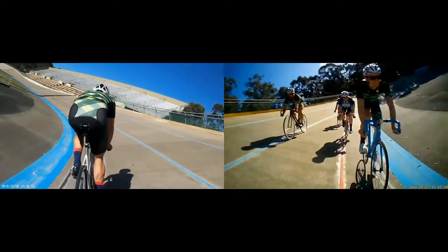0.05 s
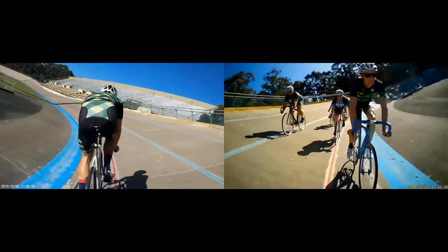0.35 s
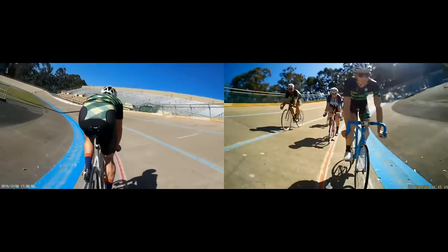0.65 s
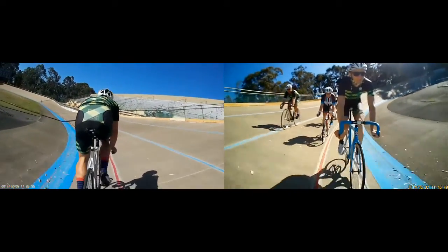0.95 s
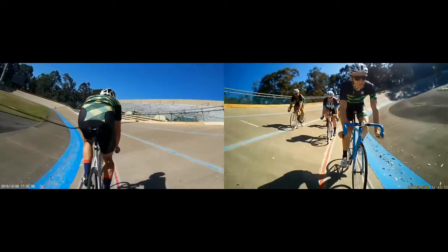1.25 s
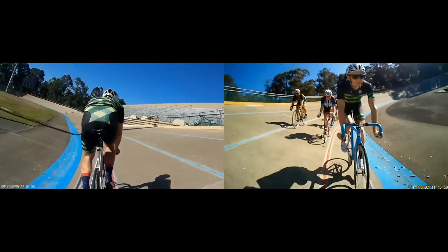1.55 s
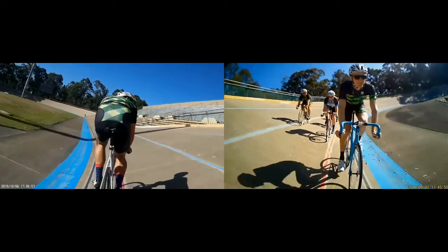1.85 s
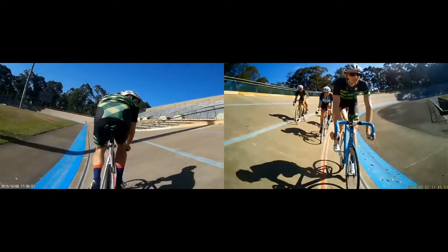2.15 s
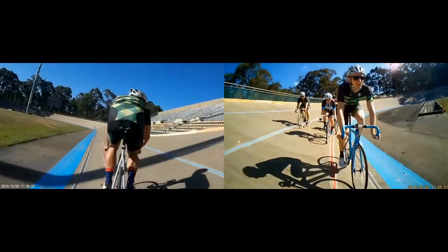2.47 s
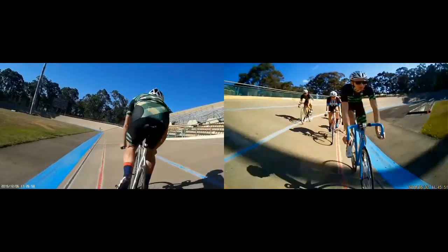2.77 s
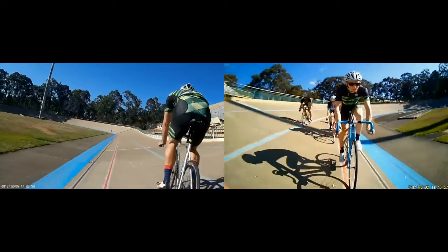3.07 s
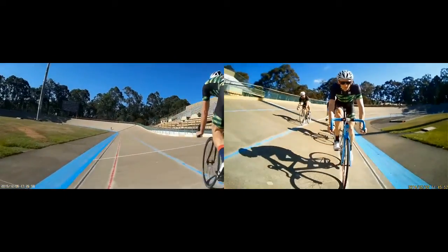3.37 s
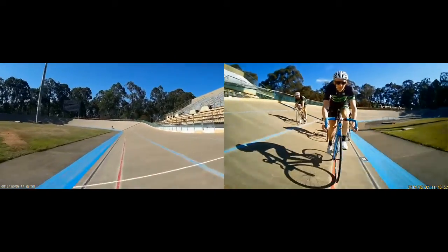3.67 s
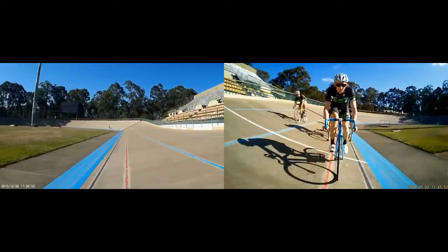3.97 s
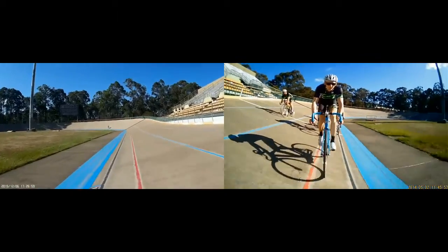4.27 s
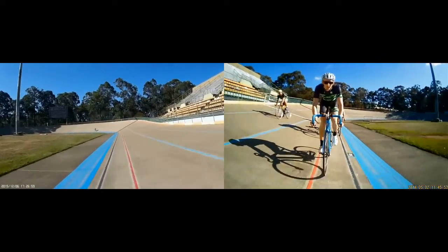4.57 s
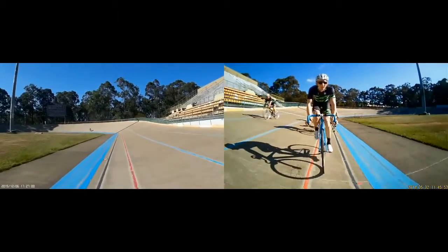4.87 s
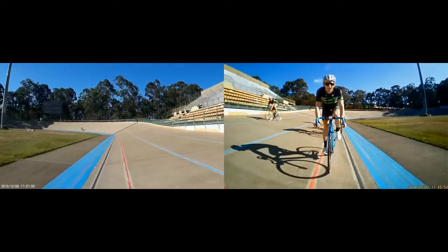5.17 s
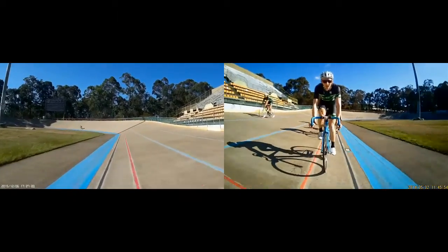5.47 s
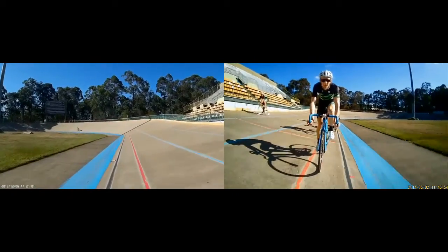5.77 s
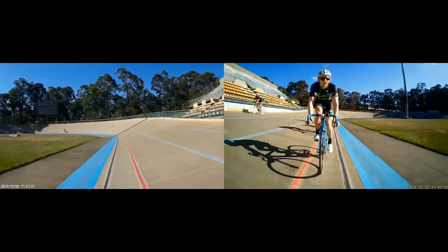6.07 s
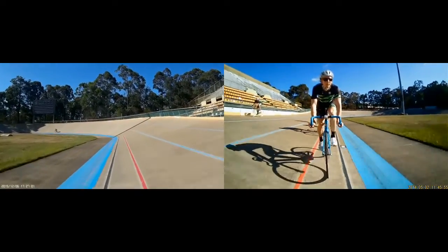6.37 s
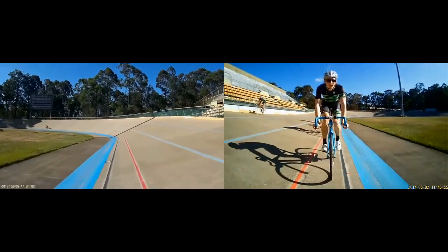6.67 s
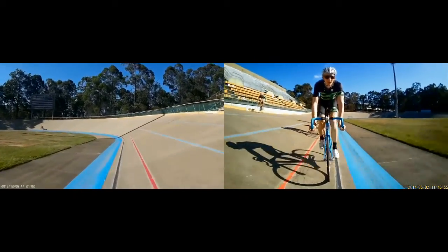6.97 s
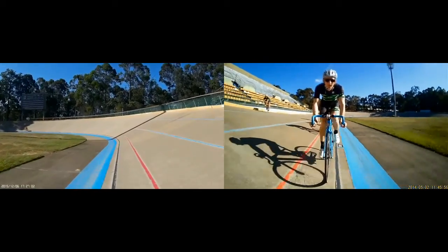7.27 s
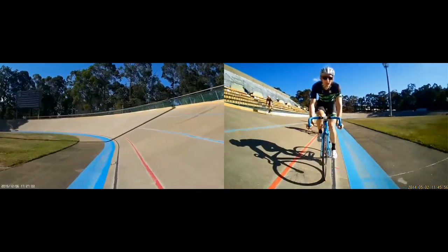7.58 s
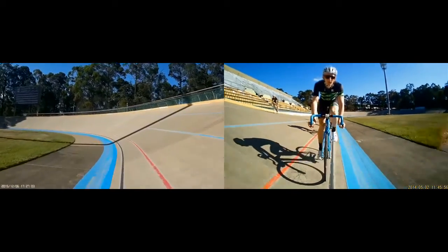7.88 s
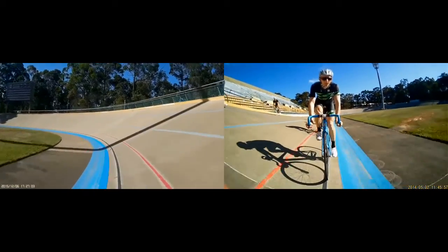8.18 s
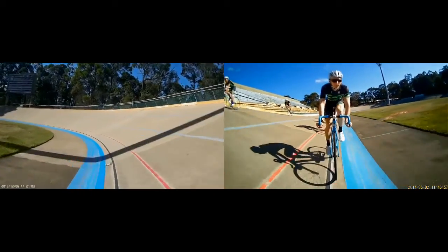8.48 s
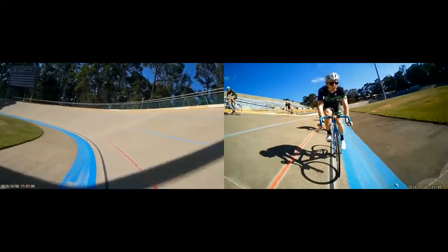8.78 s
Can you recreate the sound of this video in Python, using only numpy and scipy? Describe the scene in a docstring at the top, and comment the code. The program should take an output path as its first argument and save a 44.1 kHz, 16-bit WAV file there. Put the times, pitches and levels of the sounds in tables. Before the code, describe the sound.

A bicycle laps an open-air concrete track, heard from a microphone on its frame. Low, gusty wind noise is loudest throughout, moderate at first and then rougher, with clusters of blunt blows from about a third of the way in. Quieter tyre noise runs evenly beneath it, along with a faint chain whir, occasional light rattles and a few brief gritty scrapes.

```python
"""A concrete velodrome, heard from a microphone fixed to the frame of a lapping track bicycle.
Rough concrete excites the tyres, whose rush is coloured by resonances of the frame and housing.
The chain strikes the chainring tooth by tooth, and now and then grates, ticks and clinks.
Loudest is the wind: turbulent pressure rumbles on the microphone and single eddies slap it.
Tyres, chain and rumble swell a little with each pedal stroke."""
import sys
import numpy as np
from scipy import signal
from scipy.fft import rfft, irfft, next_fast_len
from scipy.io import wavfile
from scipy.ndimage import uniform_filter1d, map_coordinates

SR = 44100
rng = np.random.default_rng(int(sys.argv[2]) if len(sys.argv) > 2 else 0)


def transcribe(signal):
    """Save signal, clipped to [-1, 1], as a 16-bit WAV file at the path in sys.argv[1]."""
    frames = np.atleast_2d(signal).T
    limited = np.clip(frames, -1, 1)
    pcm = np.round(limited * 32767).astype(np.int16)
    wavfile.write(sys.argv[1], SR, pcm)


N = 389403

# Spectral shapes: frequency_hz, relative_db
TYRE_SPECTRUM = [(100, 4), (400, 10.5), (700, -8), (1150, 2.5), (1500, -5), (1900, -1), (2800, -1),
                 (3400, 2), (4100, -1.5), (4600, -9), (7000, -12.5), (8300, -18.5), (10000, -16),
                 (13000, -25)]  # rubber on concrete
LINK_SPECTRUM = [(1500, 6), (3300, -8), (5000, 3), (7300, 2.5), (8200, 0.5), (9000, 2), (10300, 1.5),
                 (11000, -5), (12800, -2), (14000, -30)]  # steel contacts
GRATE_SPECTRUM = [(2000, -19), (3500, 6), (5500, -2), (7800, 0), (9000, -19), (13000, -24)]  # plates rubbing teeth
RUMBLE_SPECTRUM = [(8, -6), (20, 2.5), (36, 1), (55, -3), (80, -13), (120, -24), (200, -35.5), (400, -47.5),
                   (1000, -104)]  # large eddies
BUFFET_SPECTRUM = [(20, -26), (50, -0.5), (80, 3.5), (125, -6), (180, -12.5), (260, -18), (400, -29.5),
                   (1000, -77.5)]  # middle layer of the wind
FLUTTER_SPECTRUM = [(60, -17), (130, 0), (220, -3), (330, -8), (500, -12.5), (750, -19), (1200, -27),
                    (2000, -38.5), (5000, -72)]  # small eddies
SLAP_SPECTRUM = [(40, -5), (150, 7), (300, 1), (550, -13.5), (800, -18.5), (1400, -32), (2500, -50.5),
                 (10000, -80)]  # body of an eddy's blow
TEAR_SPECTRUM = [(200, -4.5), (650, 7), (850, -8), (1250, -8), (1800, -16.5), (3000, -23), (4500, -31),
                 (10000, -80)]  # its bright edge
# Resonances and a notch of the frame and housing: centre_hz, width_hz, lift_db
HOUSING_RESONANCES = [(385, 68, 8), (557.6, 55, 13), (878, 94, 16.5), (1132, 54, 3.5), (1342, 54, 10.5),
                      (1730, 99, 5.5), (1843, 83, -5.5), (2177, 150, 5), (3240, 120, 3), (3900, 140, 2)]
# Modes of the steel parts: pitch_hz, relative_db, t60_s
CHAINRING_MODES = [(3256, 1.5, 0.029), (3460, 2, 0.023), (3784, -2, 0.02)]
ROLLER_MODES = [(6770, -5.5, 0.022), (9500, 0.5, 0.024), (10250, -11, .012)]
PLATE_MODES = [(3310, 5, 0.022), (3490, 2, 0.017), (3840, -0.5, 0.019), (6800, -7, .012)]
# Chain speed: time_s, teeth_per_s
TOOTH_RATE = [(0, 86), (2, 84.6), (4, 86.8), (6, 87), (8.8, 86.8)]
# Level contours: time_s, relative_db
CHAIN_CONTOUR = [(0, -56.5), (1.3, -55), (1.74, -57), (1.95, -54.5), (2.4, -55), (3.24, -65), (3.8, -58.5),
                 (5.3, -64.5), (5.55, -54), (5.8, -56.5), (6.5, -59), (6.88, -54.5), (7.55, -62.5),
                 (7.74, -55.5), (8.78, -64.5)]  # running noise of the chain
RING_CONTOUR = [(0, -59.5), (2.2, -58), (2.55, -54), (3.1, -59), (3.24, -64), (3.4, -58), (4.45, -57),
                (4.65, -58.5), (5.3, -58.5), (6.4, -60), (7.0, -57), (8.8, -60)]  # chainring under the seating rollers
FLOW_CONTOUR = [(0.0, -22), (0.05, -20), (0.12, -31.5), (0.42, -30), (0.51, -25), (0.58, -31.5),
                (0.73, -24.5), (0.78, -29.5), (1.1, -25), (1.22, -25.5), (1.27, -25.5), (1.47, -30.5),
                (1.57, -24), (1.74, -36.5), (1.96, -21.5), (2.25, -24), (2.28, -29), (2.4, -23),
                (2.45, -36), (2.5, -22.5), (2.87, -19.5), (2.89, -14.5), (3.09, -22), (3.33, -17),
                (3.38, -26), (3.45, -15), (3.67, -23), (3.8, -14), (3.87, -15.5), (3.92, -24),
                (3.95, -15.5), (4.16, -20), (4.29, -15), (4.48, -22), (4.63, -15), (4.71, -26), (4.81, -24),
                (4.88, -16.5), (4.99, -22.5), (5.07, -18), (5.12, -24.5), (5.2, -19), (5.27, -28),
                (5.39, -14.5), (5.44, -16.5), (5.68, -17.5), (5.83, -26.5), (5.96, -19), (6.35, -22.5),
                (6.37, -26), (6.54, -17), (6.77, -27.5), (6.86, -19.5), (6.91, -25.5), (6.96, -22),
                (7.27, -21.5), (7.38, -15.5), (7.53, -22), (7.68, -18), (7.79, -26), (7.89, -17),
                (8.09, -21.5), (8.13, -17.5), (8.33, -20), (8.36, -15.5), (8.48, -24.5), (8.8, -16.5)]  # rumble of the air flow, with brief lulls
TURBULENCE_CONTOUR = [(0, -53), (.5, -40.5), (1.05, -42), (1.3, -42.5), (1.85, -46), (2.07, -39),
                      (2.3, -59), (2.56, -44), (2.64, -36.5), (3.05, -37), (3.14, -40), (3.3, -30),
                      (3.8, -35.5), (4.08, -35), (4.4, -35), (4.6, -36), (4.75, -33.5), (5.0, -34),
                      (5.26, -43), (5.45, -32.5), (5.62, -31), (5.8, -42.5), (6.0, -37), (6.12, -35),
                      (6.4, -34), (6.58, -39), (7.08, -38.5), (7.3, -34), (7.58, -43), (7.85, -46),
                      (8.1, -39.5), (8.24, -35.5), (8.36, -38.5), (8.65, -35), (8.8, -32.5)]  # flutter, rising once the rider ahead swings off
# Brief swells of the chain: middle_s, length_s, level_db
PING_SWELLS = [(2.935, 0.046, -62), (4.07, .09, -67), (4.448, 0.036, -52), (5.0, .04, -55), (5.18, .1, -64),
               (5.56, 0.11, -61), (6.67, .12, -61), (7.6, .03, -61), (7.75, .09, -58)]  # rollers ping harder
GRATE_SWELLS = [(2.753, 0.15, -53.5), (3.813, 0.12, -54), (4.19, 0.19, -53)]  # plates grate
# Ticks of small steel parts: start_s, ring_db, pitch_hz, t60_s, crack_db
STEEL_TICKS = [(0.2005, -47, 9600, .02, -48), (0.575, -54, 9600, .02, -42), (0.7253, -42, 9560, .022, -49),
               (0.7617, -46, 9690, .02, -46), (0.8435, -44, 9560, .02, -47), (1.312, -44, 9300, 0.018, -41),
               (1.856, -42, 9560, .022, -46), (2.2309, -48, 9500, .02, -48), (2.312, -51, 9560, .02, -45),
               (2.6853, -42, 7800, .011, -52), (2.788, -40, 7700, .011, -52), (2.818, -37, 7700, .011, -56),
               (3.794, -37, 7600, .011, -48), (3.8911, -47, 9700, .012, -47),
               (4.1331, -49, 7600, 0.0099, -48), (4.2555, -34, 7640, 0.0096, -46),
               (4.5531, -45, 9500, .02, -47), (4.7046, -47, 7010, .011, -43), (5.068, -52, 9600, .02, -46),
               (5.6325, -42, 9500, .02, -46), (5.7698, -48, 9500, .02, -53), (6.2627, -45, 9600, .02, -48),
               (6.8069, -43, 9450, 0.02, -54), (7.1397, -42, 7660, .011, -53), (7.477, -43, 9600, .03, -44),
               (7.49, -45, 9700, .02, -51), (8.3814, -47, 6660, .011, -46)]
# Duller clinks of the shaking chain: start_s, relative_db
CHAIN_SHAKES = [(0.2104, -49), (0.341, -39), (0.4823, -48), (1.1827, -42), (2.0368, -44), (2.2887, -48),
                (2.545, -45), (2.755, -47), (2.9913, -45), (3.0849, -45), (3.5666, -44.5), (3.68, -43),
                (3.78, -40), (3.8067, -44), (4.2228, -43), (4.2557, -43), (4.4278, -46), (5.2874, -38),
                (6.385, -43), (7.5102, -42), (8.62, -41.5)]
# Pressure swings of large eddies: middle_s, peak_db, width_s
PRESSURE_SWINGS = [(1.123, -11.5, 0.0023), (2.899, -4, 0.0031), (3.992, -6, 0.0018), (5.392, -3.5, 0.0043),
                   (6.545, -9, 0.0049), (7.422, -17.5, 0.00074)]
# Eddies striking the microphone: time_s, relative_db, edge_re_body_db, t60_s
EDDY_IMPACTS = [(0.036, -19, -33, 0.11), (0.527, -21, -15, 0.13), (0.618, -23, -24, 0.097),
                (0.976, -18.5, -12.5, 0.11), (1.024, -22, -30, 0.066), (1.084, -23, -7, 0.062),
                (1.121, -20, -24, 0.11), (1.153, -17, -16, 0.054), (1.534, -23, -18, 0.15),
                (1.636, -26, -25, 0.055), (2.389, -24, -10, 0.035), (2.723, -16.5, -20, 0.043),
                (2.893, -10.5, -11.5, 0.039), (2.932, -17.5, -7.5, 0.088), (2.987, -19.5, -8, .06),
                (3.051, -17, -32, 0.074), (3.293, -11.5, -22, 0.14), (3.352, -10.5, -12, .04),
                (3.364, -12, -12, 0.036), (3.371, -10, -13, .02), (3.375, -5.5, -5.5, 0.033),
                (3.435, -13, -12.5, .03), (3.441, -10.5, -22, .03), (3.533, -24, -28, .06),
                (3.622, -17.5, -25, 0.055), (3.776, -16, -17, 0.067), (3.836, -19.5, -10, .07),
                (3.87, -16, -26, 0.036), (3.935, -16.5, -17, .05), (3.986, -14.5, -14, 0.15),
                (4.006, -14.5, -9, 0.1), (4.138, -25, -5.5, .05), (4.205, -21, -6.5, 0.2),
                (4.326, -9.5, -9.5, 0.046), (4.348, -12, -15, .035), (4.377, -12.5, -20, 0.047),
                (4.47, -16.5, -6, 0.041), (4.512, -10, -3, 0.062), (4.522, -11.5, -5, 0.029),
                (4.578, -15.5, -11, 0.093), (5.312, -15.5, -20, 0.037), (5.391, -13, -6.5, 0.14),
                (5.413, -14, -8, 0.046), (5.434, -18, -5, 0.037), (5.516, -15, -7, 0.039),
                (5.565, -12, -12, .04), (5.594, -9, -15, .05), (5.612, -15, -13, 0.037),
                (5.655, -13, -16, 0.081), (5.696, -13.5, -6, .05), (5.866, -18, -32, .07),
                (5.994, -16, -11, .07), (6.019, -9.5, -5.5, 0.14), (6.158, -11, -24, 0.054),
                (6.185, -11.5, -7, 0.047), (6.524, -14, -11, 0.14), (6.54, -11, -11.5, 0.14),
                (6.56, -8, -19, .04), (6.64, -20, -26, .04), (6.737, -11.5, -20, .085),
                (7.22, -21, -19, 0.092), (7.248, -16, -22, 0.14), (7.421, -15.5, -4, 0.036),
                (7.643, -17, -18, 0.13), (7.742, -16, -25, 0.044), (7.862, -12.5, -38, 0.049),
                (8.225, -14, -13, 0.089), (8.771, -14.5, -10.5, 0.28)]

CHAINRING_TEETH = 48
TYRE_DB, PING_DB, RASP_DB = -45, -10.5, -1.3  # ping and rasp are relative to the chain contour
RUMBLE_DB, FLUTTER_DB, GUST_DB = 1.2, -1, 1.5  # offsets to the wind contours; depth of random gusts
BUFFET_DB, BUFFET_GROWTH = -9, 0.18  # relative to the rumble; extra dB per dB of flow
EDDY_RISE_S, WAKE_RISE_S, WAKE_FALL_S = 0.021, 0.13, 0.1  # times for a change of 60 dB
WAKE_DB = -22.5  # ragged air around an eddy, relative to its peak
OVERLOAD, TOP_HZ = 0.94, 13600  # the microphone's amplitude ceiling and band limit


def amp(db):
    """Amplitude ratio of a level in decibels."""
    return 10 ** (np.asarray(db) / 20)


def unit(x):
    """Normalisation to rms 1."""
    return x / np.sqrt(np.mean(x ** 2) + 1e-20)


def contour(rows):
    """Linear interpolation of (time_s, value) rows at every sample."""
    return np.interp(np.arange(N) / SR, *np.transpose(rows))


def wobble(rate_hz):
    """Smooth random modulation of rms 1: a spline through rate_hz knots a second."""
    knots = rng.standard_normal(int(N * rate_hz / SR) + 4)
    return unit(map_coordinates(knots, [np.arange(N) * rate_hz / SR]))


def swells(rows):
    """Gaussian envelopes: the gain rises and falls once for each row."""
    t = np.arange(N) / SR
    return sum(amp(db) * np.exp(-(2 * (t - s) / length) ** 2) for s, length, db in rows)


def colour(x, spectrum, peaks=()):
    """Minimum-phase filtering by a smooth spectrum with resonances on top; the result has rms 1."""
    size = 2 * next_fast_len(N // 2 + 8192)
    hz = np.fft.rfftfreq(size, 1 / SR)
    knot_hz, knot_db = np.transpose(spectrum)
    db = np.interp(np.log(hz + 1), np.log(knot_hz + 1), knot_db)
    db += sum(lift / (1 + (2 * (hz - centre) / width) ** 2) for centre, width, lift in peaks)
    cepstrum = irfft(np.log(amp(db)))
    cepstrum[1:size // 2] *= 2  # folding the cepstrum makes the filter causal
    cepstrum[size // 2 + 1:] = 0
    return unit(irfft(rfft(x, size) * np.exp(rfft(cepstrum)))[:N])


def noise(spectrum):
    """Spectral shaping of white noise, at rms 1."""
    return colour(rng.standard_normal(N), spectrum)


def steady(x, seconds):
    """Division by the running rms evens out swells slower than the given time."""
    power = uniform_filter1d(x ** 2, max(int(seconds * SR), 8))
    return x / np.sqrt(np.abs(power) + 1e-6)


def patches(x, depth_db):
    """Band-wise modulation: each band swells and sinks on its own for about a tenth of a second."""
    bands = signal.stft(x, nperseg=1024)[2]
    field = uniform_filter1d(rng.standard_normal(bands.shape), size=6, axis=0)
    field = uniform_filter1d(field, size=8, axis=1)
    return signal.istft(bands * amp(depth_db * unit(field)), nperseg=1024)[1][:N]


def ringing(starts, gains, modes, detune):
    """Modal superposition: each knock excites damped sines, a little off in pitch and strength."""
    lag = np.arange(SR // 40)
    t, waves = lag / SR, 0
    scatter = rng.standard_normal((len(starts), len(modes), 2))
    for k, (hz, db, t60) in enumerate(modes):
        pitch, strength = scatter[:, k].T[:, :, None]
        envelope = amp(db + 2.5 * strength - 60 * t / t60)
        waves = waves + envelope * np.sin(2 * np.pi * hz * (1 + detune * pitch) * t)
    waves *= gains[:, None] * (1 - np.exp(-t / .0003))
    return np.bincount((starts[:, None] + lag).ravel(), waves.ravel(), N)[:N]


def pedalling(depth_db, peak_turns, per_turn=2):
    """Periodic modulation in dB, locked to the cranks; two swells a turn are one for each leg."""
    turns = np.cumsum(contour(TOOTH_RATE)) / SR / CHAINRING_TEETH
    return depth_db * np.cos(2 * np.pi * per_turn * (turns - peak_turns))


def tyres():
    """Roughness excitation: rubber on concrete makes a grainy rush that rings frame and housing."""
    level_db = TYRE_DB + pedalling(depth_db=1, peak_turns=.48) + 0.37 * wobble(3.3)
    grain = amp(0.99 * wobble(30) + 1.67 * wobble(400))
    road = patches(grain * rng.standard_normal(N), depth_db=1.5)
    return amp(level_db) * colour(road, TYRE_SPECTRUM, HOUSING_RESONANCES)


def chain():
    """Periodic impact: each roller pings, scrapes and rings the chainring as it seats on a tooth."""
    tension_db = pedalling(depth_db=0.9, peak_turns=0.47)  # each stroke tightens the chain
    running_db = contour(CHAIN_CONTOUR) + tension_db
    seats = np.diff(np.floor(np.cumsum(contour(TOOTH_RATE)) / SR), prepend=0)
    impacts = seats * amp(2 * rng.standard_normal(N) + 2.2 * wobble(26))
    starts = np.flatnonzero(seats)
    ring = steady(ringing(starts, impacts[starts], CHAINRING_MODES, detune=0.028), seconds=0.17)
    roller_hits = (impacts * amp(2 * wobble(24)))[starts]
    ping = steady(ringing(starts, roller_hits, ROLLER_MODES, detune=0.0076), seconds=0.13)
    loose_links = rng.random(N) < 200 / SR  # about 200 knocks a second
    chatter = loose_links * amp(-9 + 4.5 * rng.standard_normal(N) + 2.5 * wobble(25))
    t = np.arange(SR // 20) / SR
    scrape = amp(-60 * t / .034) * (1 - np.exp(-t / .0002))
    contact = signal.oaconvolve(impacts + chatter, scrape)[:N]
    rasp = steady(colour(contact * rng.standard_normal(N), LINK_SPECTRUM), seconds=0.22)
    ring_gain = amp(contour(RING_CONTOUR) + tension_db + 1.5 * wobble(30))
    ping_gain = np.hypot(amp(running_db + PING_DB), swells(PING_SWELLS))
    rasp_gain = amp(running_db + RASP_DB + 1.1 * wobble(24))
    return ring_gain * ring + ping_gain * ping + rasp_gain * rasp


def grates():
    """Sliding friction: link plates rub the side of the teeth with a gritty hiss."""
    grit = amp(4.4 * wobble(180)) * rng.standard_normal(N)
    return swells(GRATE_SWELLS) * colour(grit, GRATE_SPECTRUM)


def faint_ticks(count=10, middle_db=-49, middle_hz=7000):
    """Uniform scatter in time, level and pitch gives further rows like those of STEEL_TICKS."""
    when, strength, pitch = rng.random((count, 3)).T
    levels_db = middle_db + 6 * (strength - .5)
    pitches_hz = middle_hz * 2 ** (0.73 * (pitch - .5))
    return [(s, db, hz, .015, db - 2) for s, db, hz in zip(when * (N - 1) / SR, levels_db, pitches_hz)]


def rattles(crack_t60_s=.03):
    """Damped free vibration: small steel parts tick with a bright crack and a very short ring."""
    out, t = np.zeros(N + SR), np.arange(SR // 20) / SR
    hiss = np.pad(noise(LINK_SPECTRUM), (0, SR))
    for s, ring_db, ring_hz, t60, crack_db in STEEL_TICKS + faint_ticks():
        start = round(s * SR)
        span = slice(start, start + len(t))
        phase_drift = 0.16 * np.cumsum(rng.standard_normal(len(t)))
        ring = amp(ring_db - 60 * t / t60) * np.sin(2 * np.pi * ring_hz * t + phase_drift)
        crack = amp(crack_db - 60 * t / crack_t60_s) * hiss[span]
        out[span] += ring + crack
    return out[:N]


def clinks(bounce_s=.013, loss_db=5, crack_db=-11.5):
    """Inelastic rebound: plates of the shaking chain knock and ring three times, ever more weakly."""
    s, db = np.transpose(CHAIN_SHAKES)[:, :, None]
    bounce = np.arange(3)
    jitter = rng.uniform(-.15, .15, (len(CHAIN_SHAKES), len(bounce)))
    starts = np.round((s + bounce_s * bounce * (1 + jitter)) * SR).astype(int).ravel()
    gains = amp(db - bounce * loss_db).ravel()
    t = np.arange(SR // 40) / SR
    contact = signal.oaconvolve(np.bincount(starts, gains, N), amp(crack_db - 60 * t / 0.023))[:N]
    return ringing(starts, gains, PLATE_MODES, detune=0.022) + contact * noise(LINK_SPECTRUM)


def thuds():
    """Convected pressure: a large eddy passing over the microphone port sucks, then pushes."""
    t, out = np.arange(N) / SR, np.zeros(N)
    for s, db, width in PRESSURE_SWINGS:
        passage = (t - s) / width
        out += amp(db) * passage * np.exp((1 - passage ** 2) / 2)
    return out


def slaps():
    """Eddy impact and flow separation: each blow thumps in a weaker wake; the sharpest tear brightly."""
    t, body_power, edge_power = np.arange(N) / SR, np.zeros(N), np.zeros(N)
    for s, db, edge_db, t60 in EDDY_IMPACTS:
        near = np.abs(t - s) < .15
        age = t[near] - s - .003
        blow = amp(db - 60 * np.maximum(age / t60, -age / EDDY_RISE_S))
        wake = amp(db + WAKE_DB - 60 * np.maximum(age / WAKE_FALL_S, -age / WAKE_RISE_S))
        power = blow ** 2 + wake ** 2
        body_power[near] += power
        edge_power[near] += power * amp(edge_db - 36 * np.abs(age)) ** 2
    thump = amp(-5.5) * np.sqrt(body_power) * steady(noise(SLAP_SPECTRUM), seconds=0.0046)
    spurts = amp(3.1 * wobble(600))  # the flow separates in quick spurts
    tear = amp(-6.5) * np.sqrt(edge_power) * steady(spurts * noise(TEAR_SPECTRUM), seconds=0.0071)
    return thump + tear


def wind():
    """Turbulent pressure: large eddies rumble, strong flow buffets higher, small eddies flutter."""
    flow_db = contour(FLOW_CONTOUR)
    gust = wobble(20)
    gust_db = GUST_DB * gust - 0.19 * np.minimum(gust, 0) ** 2  # lulls cut deeper than gusts rise
    sway_db = pedalling(depth_db=1, peak_turns=0.72, per_turn=1)  # the bicycle rocks through the air
    rumble_db = flow_db + RUMBLE_DB + gust_db + pedalling(depth_db=0.44, peak_turns=0.27)
    buffet_db = rumble_db + BUFFET_DB + BUFFET_GROWTH * (flow_db - flow_db.mean())
    flutter_db = contour(TURBULENCE_CONTOUR) + FLUTTER_DB + 1.54 * gust_db + sway_db
    rumble = steady(noise(RUMBLE_SPECTRUM), seconds=0.052)
    buffet = steady(amp(2.9 * wobble(45)) * noise(BUFFET_SPECTRUM), seconds=0.0816)
    lumps = amp(3.5 * wobble(70) + 2.9 * np.abs(rumble))  # strongest when the pressure swings far
    flutter = steady(lumps * noise(FLUTTER_SPECTRUM), seconds=0.065)
    return amp(rumble_db) * rumble + amp(buffet_db) * buffet + amp(flutter_db) * flutter


def scene():
    """Linear superposition of wind and bicycle at one microphone."""
    return (wind() + thuds() + slaps() + tyres() + chain() + grates() + rattles() + clinks())[None]


def record(dry):
    """Soft saturation rounds off the hardest gusts; a steep low-pass limits the band."""
    saturated = dry / (1 + np.abs(dry / OVERLOAD) ** 6) ** (1 / 6)
    size = next_fast_len(N + 8192)
    hz = np.fft.rfftfreq(size, 1 / SR)
    return irfft(rfft(saturated, size) / (1 + (hz / TOP_HZ) ** 60), size)[:, :N]


dry = scene()
out = record(dry)
transcribe(out)
```